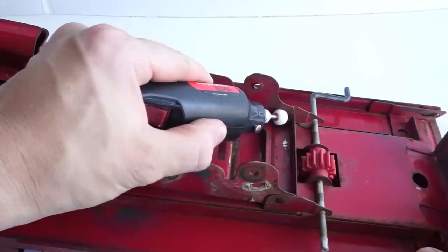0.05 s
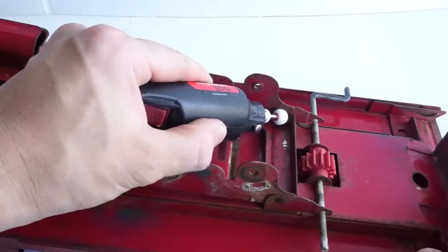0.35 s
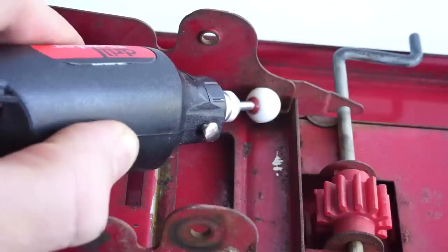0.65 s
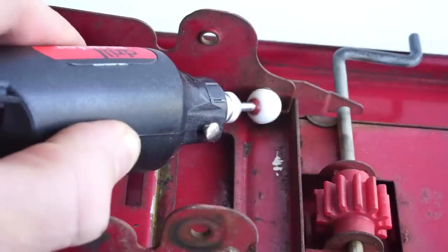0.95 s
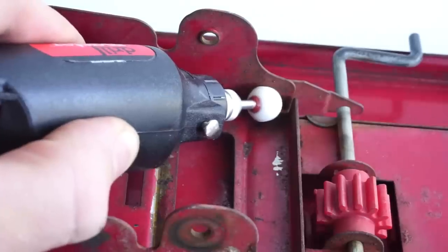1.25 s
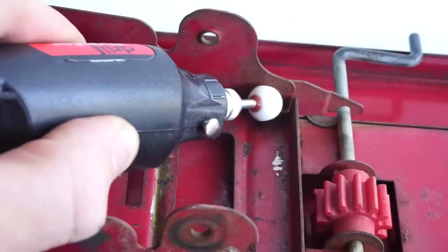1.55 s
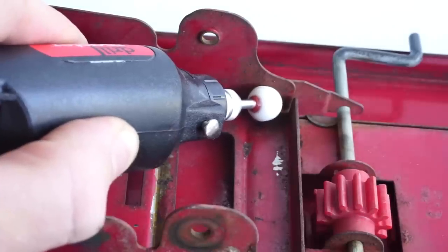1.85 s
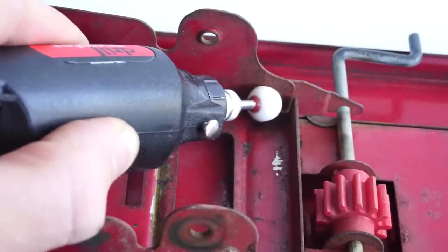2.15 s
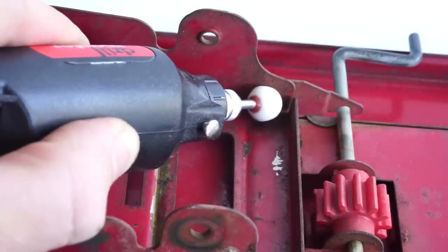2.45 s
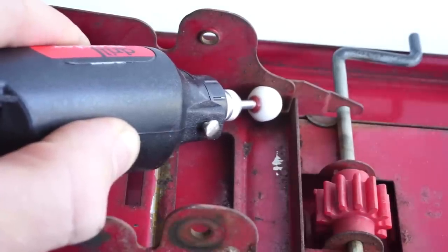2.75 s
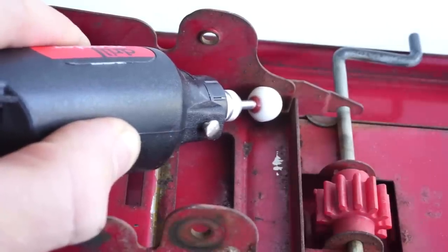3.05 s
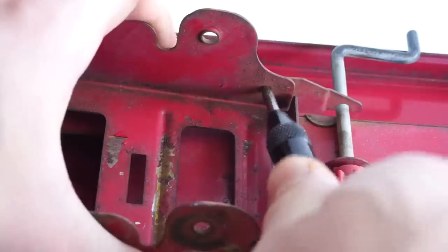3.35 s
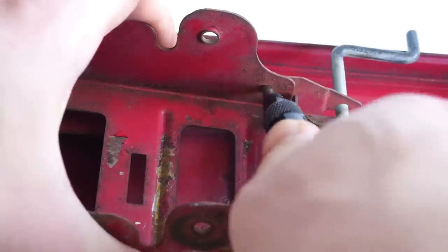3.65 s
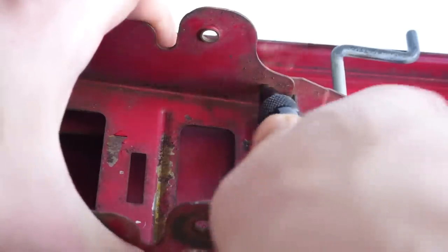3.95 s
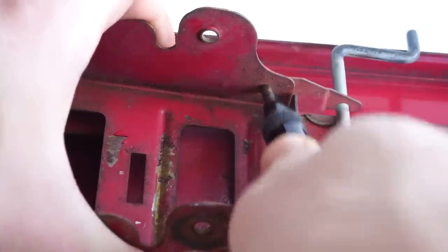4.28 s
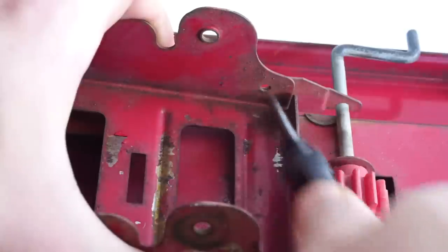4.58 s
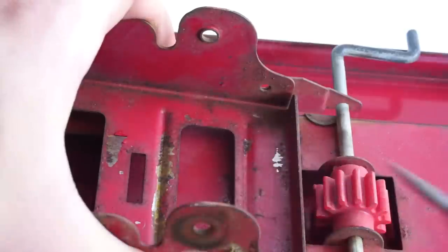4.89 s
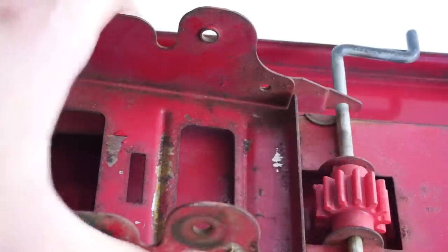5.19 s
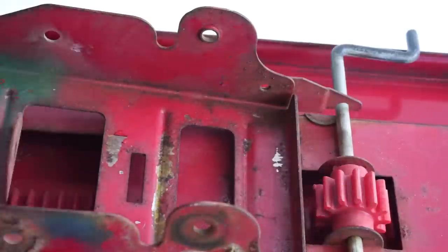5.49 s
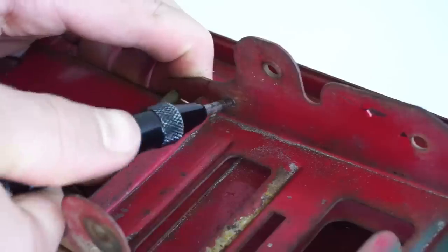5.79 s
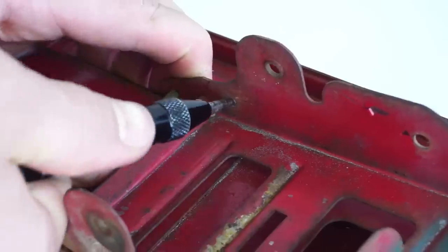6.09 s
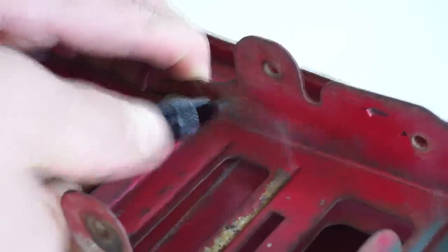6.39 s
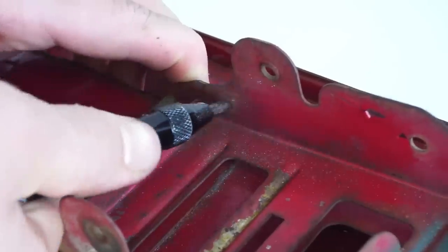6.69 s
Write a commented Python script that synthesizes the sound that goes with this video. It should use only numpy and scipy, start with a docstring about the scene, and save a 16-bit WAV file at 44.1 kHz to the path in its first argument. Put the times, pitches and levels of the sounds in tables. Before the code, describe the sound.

A small rotary tool whines at a high pitch from the start, close and just left of centre, its stone rasping on a steel toy's rivet. After a tiny break at 0.4 seconds, the grinding grows rougher and more chattering as the motor's pitch gradually sags. It cuts off at about 3.2 seconds, leaving a faint, low workshop rumble.

A pen-like electrode knocks dully and scrapes on the sheet metal around 3.3 and 3.6 seconds. At 4 seconds it makes contact with a sharp snap and a brief sizzle of burning paint, and the steel rings faintly. Light ticks, dry crackles and scratches follow, with a firmer knock near 4.7 seconds and softer knocks and scrapes until 5.9. At 6.4 seconds, now further right, come a second snap and sizzle, a pop and lingering metallic tones, then one last sharp click at 6.8.

```python
"""A small rotary tool whines, then grinds a rivet on a pressed-steel toy, rasping and chattering
and slowing as the stone is pressed home. The grinding breaks off to the rumble of the workshop.
At the bench, before a stereo pair of microphones, a pen-like electrode knocks and scrapes on the sheet;
twice it makes contact with a snap and a sizzle of boiling paint, and the steel rings."""
import sys
import numpy as np
from scipy import signal
from scipy.fft import rfft, irfft, next_fast_len
from scipy.io import wavfile

SR = 44100
rng = np.random.default_rng(int(sys.argv[2]) if len(sys.argv) > 2 else 0)


def store_pcm(level_fs):
    """Save levels as 16-bit WAV."""
    pcm = np.round(np.clip(level_fs, -1, 1) * 32767).astype(np.int16)
    wavfile.write(sys.argv[1], SR, np.atleast_2d(pcm).T)


N = 301203
T = np.arange(N) / SR
CUT_S, GRIND_END_S, SHIFT_RIGHT_S = .417, 3.168, 5.57
FREE_HZ, TOP_HZ = 242, 11080  # shaft running free; upper edge of the treble


# The tool's speed, sagging as the stone is pressed home: time_s, shaft_hz
SHAFT_SPEED = [(0.03, 241.3), (0.1, 238.4), (0.3, 234.3), (0.425, 233.5), (0.435, 241.7), (0.62, 241.6),
               (0.95, 238.7), (1.12, 235.3), (1.3, 235.7), (1.53, 225.8), (1.72, 226), (1.86, 220.5),
               (2.13, 223.5), (2.27, 218.7), (2.43, 221.3), (2.58, 218.6), (3.08, 214.9)]
# Tone of the motor's whine, the high spots' chatter and the stone's rasp, each: freq_hz, level_db
WHINE_SPECTRUM = [(400, -12), (700, -18.5), (1200, 0.5), (1900, 3), (2350, 7), (3000, 4), (4000, -12),
                  (4700, 17), (5400, -1), (6800, -16), (7500, 4.5), (11000, -36)]
CHATTER_SPECTRUM = [(400, -53), (650, -16), (1050, 0), (1700, -11), (2400, 10), (4000, 0), (5700, 9.5),
                    (7000, 7.5), (11000, -41)]
RASP_SPECTRUM = [(40, -36.5), (300, -28), (550, -36), (760, -20.5), (1050, -9.5), (1600, -13), (2200, -1.5),
                 (3500, -6), (4700, -2), (6800, -7), (7800, 0), (11000, 1.5)]

def grinder():
    """Just left of centre a motor whines; the stone's high spots strike once a turn and its grains rasp."""
    hz, = curves(SHAFT_SPEED)
    rasp_db, chatter_db, whine_db, hum_db = loading(hz)
    turn = np.cumsum(hz * (1 + 0.0012 * walk(60))) / SR
    whine = through_body(orders(turn, flicker_db=2.5, flicker_rate=14), WHINE_SPECTRUM) * undb(whine_db)
    skid = .005 * walk(130)  # the stone skids from turn to turn, blurring its high orders
    bite = undb(1.53 * walk(34.82))
    strikes = orders(turn + skid, flicker_db=5.0, flicker_rate=24)
    chatter = through_body(strikes, CHATTER_SPECTRUM) * undb(chatter_db)
    grains = air(N) * (1 + 0.1 * np.cos(2 * np.pi * turn)) * undb(walk(400))
    rasp = through_body(grains, RASP_SPECTRUM) * undb(rasp_db)
    hum = (np.sin(2 * np.pi * turn) + 0.25 * np.sin(4 * np.pi * turn)) * undb(hum_db + 2 * walk(31))
    return (whine + shank(hz) + bracket(hz) + bite * (chatter + rasp)) * pan(1.2) + hum


# The stone catches and chatters for a moment: peak_s, lift_db
STONE_CATCHES = [(.02, 12), (.6, 9), (1.5, 4)]

def loading(hz, shake_hz=226, shake_width_hz=4.3, catch_s=0.037):
    """Levels of rasp, chatter, whine and hum, from how far the work drags the shaft speed down."""
    sag_hz, before_cut = FREE_HZ - hz, T < CUT_S
    # while grinding, whine and hum are weak but swell as the speed passes shake_hz
    shake_db = 7.5 * np.exp(-((hz - shake_hz) / shake_width_hz) ** 2)
    catch_db = sum(db * np.exp(-.5 * ((T - s) / catch_s) ** 2) for s, db in STONE_CATCHES)
    rasp_db = -34 + 0.12 * sag_hz - 1.5 * before_cut
    chatter_db = -49 + 0.509 * sag_hz + catch_db
    whine_db = np.where(before_cut, -42 + 1.3 * sag_hz, -46 + shake_db)
    hum_db = np.where(before_cut, -61.5, -78.5 + shake_db)
    return rasp_db, chatter_db, whine_db, hum_db


def orders(turn, flicker_db, flicker_rate, count=52):
    """Multiples of the shaft rate, each wavering by itself; high ones reach the microphones out of step."""
    out = np.zeros((2, N))
    for k in range(1, count + 1):
        level = undb(flicker_db * walk(flicker_rate))
        phase = 2 * np.pi * k * turn + rng.uniform(0, 2 * np.pi)
        lead = rng.choice([-1, 1]) * min(0.13 * np.sqrt(k), np.pi / 4)
        out += level * np.cos([phase + lead, phase - lead])
    return out


# Resonances of tool and clamped work, before coupling scales them: pitch_hz, width_hz, left_db, right_db
BODY_RESONANCES = [(655, 45, 11, 11), (1082, 45, 13, 8), (1325, 70, 9, 9), (1880, 60, 4, 4),
                   (2378, 60, 7, 11), (4340, 80, 7, 8), (4575, 80, 13, 6), (4830, 80, 13, 12),
                   (5520, 60, 8, 2), (5647, 45, 10, 9), (5839, 40, 12, 5), (7380, 70, 9, 3),
                   (7633, 60, 9, 3), (8221, 50, 8, 6), (8680, 40, 5, 5), (9178, 45, 7, 6),
                   (9468, 60, 10, 2), (9808, 35, 7, 9), (10136, 55, 9, 3), (10425, 80, 10, 5),
                   (10860, 100, 6, 5)]

def through_body(x, points, coupling=1.244):
    """Tool and work radiate a spectrum, their resonances lifting it differently at each microphone."""
    def gain(f):
        lift_db = sum(np.array([[left], [right]]) * resonance(f, hz, width)
                      for hz, width, left, right in BODY_RESONANCES)
        return undb(spectrum(points, f) + coupling * lift_db) * (f < TOP_HZ)
    return unit(colour(x, gain))


def shank(shaft_hz, throb_db=7, throb_rate=24.33):
    """The stone on its thin shank squeals in uneven throbs, most while it spins fast."""
    squeal = unit(colour(air(N), lambda f: resonance(f, hz=4828, width_hz=70)))
    return squeal * undb(-39 - 1.03 * (FREE_HZ - shaft_hz) + throb_db * walk(throb_rate))


def bracket(shaft_hz, pressed_db=-44):
    """The rivet's bracket sings in a narrow band, loudest when the stone is pressed hardest."""
    tone = unit(colour(air(N), lambda f: resonance(f, hz=1082, width_hz=44)))
    return tone * undb(pressed_db - 1.75 * (shaft_hz - shaft_hz.min()))


# Dull knocks at the bench: start_s, level_db, brightness_hz, mode_hz, ring_db
SHEET_KNOCKS = [(3.2554, -27.5, 1830, 961, -5), (3.615, -23.5, 1060, 947, -11),
                (4.6586, -23, 2190, 2360, -5.5), (5.0348, -33.5, 1110, 1293, 4.5),
                (5.579, -31.5, 840, 1174, -7)]

def knocks(thud_db=-20.5):
    """The electrode knocks on the sheet, rattles and thuds through the toy."""
    out, t = np.zeros((2, N)), T[:SR // 2]
    for s, db, hz, mode_hz, ring_db in SHEET_KNOCKS:
        thud = band(air(len(t)), hz=260, spread=0.99) * decay(t, t60=0.36) * undb(thud_db)
        rattle = strike(hz, mode_hz, t60=0.12, spread=2.24, ring_db=ring_db)
        add(out, undb(db) * (rattle + thud), s)
    return out


# Light touches on the steel: start_s, level_db, brightness_hz
TIP_TICKS = [(3.9328, -43, 4440), (4.175, -26.5, 6900), (4.311, -33.5, 5140), (4.354, -44, 4730),
             (4.374, -29, 2240), (4.408, -27, 4050), (4.588, -29.5, 3560), (4.632, -29, 5540),
             (4.715, -30.5, 4080), (5.199, -44, 4000)]

def ticks():
    """The bare tip taps the sheet, brief and bright."""
    out = np.zeros((2, N))
    for s, db, hz in TIP_TICKS:
        add(out, undb(db) * strike(hz, mode_hz=2480, t60=0.051, spread=2.24, ring_db=-5), s)
    return out


# Sharp cracks at the tip: start_s, level_db, brightness_hz
CONTACT_SNAPS = [(3.9661, -19, 2800), (6.4146, -20, 5230), (6.5539, -18.5, 930), (6.8078, -22.5, 5500)]

def snaps():
    """The current snaps and the paint pops, barely stirring the sheet."""
    out = np.zeros((2, N))
    for s, db, hz in CONTACT_SNAPS:
        add(out, undb(db) * strike(hz, mode_hz=4960, t60=0.0098, spread=3.05, ring_db=-12), s)
    return out


def strike(hz, mode_hz, t60, spread, ring_db, room_db=-25, room_t60=0.57):
    """A short rattle at the tip, the ring of the sheet and a faint tail from the room beyond."""
    t = T[:SR // 2]
    attack = 1 - np.exp(-t / (0.0059 * t60))
    push = band(air(len(t)), hz, spread) * decay(t, t60) * attack
    tail = band(air(len(t)), hz, spread) * decay(t, room_t60) * undb(room_db)
    return stir_sheet(push, mode_hz, favour_db=12, ring_db=ring_db) + tail


# The electrode's two contacts: start_s, hiss_db, sputter_db
PAINT_BURNS = [(3.966, -36.5, -36.5), (6.415, -37, -34.5)]
# Tone of the boiling paint's hiss and sputter, each: freq_hz, level_db
HISS_SPECTRUM = [(1500, -10), (3500, -31), (5000, 12.5), (7000, 4), (11000, 4.5)]
SPUTTER_SPECTRUM = [(300, -7), (700, 5), (1100, 7.5), (2300, 8.5), (3500, 11), (5000, 2), (9000, -10)]

def burns(attack_s=0.0026, hold_s=0.083, hiss_fall_db_per_s=181, sputter_fall_db_per_s=82):
    """Paint boils under the hot tip: a sudden crackling hiss over a lower sputter, dying away."""
    def sizzle(points):
        crackle = air(N) * undb(0.28 * walk(580))
        return unit(colour(crackle, lambda f: undb(spectrum(points, f)) * (f < TOP_HZ)))
    hiss, sputter = sizzle(HISS_SPECTRUM), sizzle(SPUTTER_SPECTRUM)
    push = np.zeros((2, N))
    for s, hiss_db, sputter_db in PAINT_BURNS:
        heat = np.clip((T - s) / attack_s + 1, 0, 1)
        cooling_s = np.maximum(T - s - hold_s, 0)
        push += heat * hiss * undb(hiss_db - hiss_fall_db_per_s * cooling_s)
        push += heat * sputter * undb(sputter_db - sputter_fall_db_per_s * cooling_s)
    return stir_sheet(push, mode_hz=2266, favour_db=3, ring_db=-6)


# Tones of the heated steel: start_s, pitch_hz, level_db, swell_s, t60_s
HOT_TONES = [(4.02, 1352, -44, .06, 1.3), (6.455, 2310, -32, .05, .25), (6.49, 667, -37.5, .05, 1.7),
             (6.5, 2202, -44, .05, .9), (6.45, 4078, -43, .04, .6)]

def singing():
    """Single tones of the heated sheet swell during a burn and linger after it."""
    out = 0
    for s, hz, db, swell, t60 in HOT_TONES:
        t = np.maximum(T - s, 0)
        envelope = np.minimum(t / swell, 1) * decay(np.maximum(t - swell, 0), t60)
        out += undb(db + 0.26 * walk(41)) * envelope * sine(hz * (1 + 0.0014 * walk(76)))
    return out


# Strokes across the paint: peak_s, half_length_s, level_db, brightness_hz
TIP_SCRAPES = [(3.453, 0.048, -49, 1850), (3.591, 0.058, -48, 1940), (4.479, 0.23, -50.5, 3380),
               (4.772, 0.021, -37, 2980), (5.298, 0.024, -47, 3440), (5.279, 0.27, -55.5, 3840),
               (5.863, 0.022, -37, 1250), (6.704, 0.012, -41, 2400)]

def scrapes(slips_per_s=360):
    """The tip drags over the paint in uneven slips, a few of them sharp, that stir the sheet."""
    push, t = np.zeros((2, N)), T[:2 * SR] - 1
    for s, half, db, hz in TIP_SCRAPES:
        swell = np.exp(-.5 * (t / half) ** 2) * undb(db)
        add(push, band(air(len(t)), hz, spread=1.82) * swell, s - 1)
    slips = (rng.random(N) < slips_per_s / SR) * undb(4 * np.minimum(rng.exponential(size=N), 3))
    push *= .55 + .7 * unit(smear(slips, tau_s=.002))
    return stir_sheet(push, mode_hz=3283, favour_db=2, ring_db=-8)


# Modes of the loose steel sheet: pitch_hz, level_db, t60_s
SHEET_MODES = [(961, 1.5, 0.15), (1060, -3.5, 0.18), (1293.5, -4, 0.37), (1486, -3.5, 0.15),
               (1814, -3, 0.14), (2025, -13, 0.33), (2266, -9, 0.23), (2372, 6.5, 0.053), (2832, -8, 0.22),
               (3283, -11, 0.28), (3750, -8, 0.17), (4140, -13, 0.33), (5020, -18.5, 0.15),
               (6700, -32.5, 0.42), (10400, -29, 0.22)]

def stir_sheet(push, mode_hz, favour_db, ring_db):
    """A push and the ring it stirs in the sheet; where it lands favours the modes near mode_hz."""
    t = T[:SR // 2]
    answer = np.zeros((2, len(t)))
    for hz, db, t60 in SHEET_MODES:
        scatter, lag = rng.standard_normal(2)
        lift_db = favour_db * np.exp(-(np.log(hz / mode_hz) / .08) ** 2) + 3 * scatter
        phase = 2 * np.pi * hz * t + np.array([[.6], [-.6]]) * lag
        answer += undb(db + lift_db) * decay(t, t60) * np.sin(phase)
    answer /= np.sqrt(2 * np.mean(np.sum(answer ** 2, axis=1)))
    ring = signal.fftconvolve(push, answer, axes=1)[:, :push.shape[1]]
    return push + undb(ring_db) * ring


def flakes(start_s=4.19, end_s=4.82, per_s=18, t60=0.02):
    """Burnt paint flakes off under the tip in small dry crackles at random moments."""
    cracks = (rng.random(N) < per_s / SR) * (T > start_s) * (T < end_s)
    sizes = cracks * undb(-42 + 2.5 * rng.standard_normal(N))
    return band(air(N), hz=4800, spread=1.9) * smear(sizes, tau_s=t60 / np.log(1000))


# Room tone around the bench: freq_hz, level_db
ROOM_SPECTRUM = [(15, -39), (25, -11), (66, -6.5), (101, -0.5), (178, -0.5), (391, -12.5), (721, -11),
                 (1000, -11.5), (1590, -24), (1710, -25.5), (5820, -43), (11000, -40.5), (14300, -87),
                 (22000, -120)]
# Recorded level of the rumble, ducking after the first snap and creeping back: time_s, level_db
RECORDED_RUMBLE_LEVEL = [(3.2, -46), (3.92, -44), (4.02, -50), (4.8, -46.5), (6.4, -43.5), (6.6, -44)]

def workshop():
    """Low room rumble and a faint wavering hum behind the work; their level ducks and creeps back."""
    rumble = unit(colour(air(N), lambda f: undb(spectrum(ROOM_SPECTRUM, f))))
    hum = sine(73 + 2 * walk(8.7)) * undb(-6.5 + 2 * walk(10))
    return (rumble + hum) * undb(curves(RECORDED_RUMBLE_LEVEL)[0] + walk(13))


# Stereo width at the microphone pair: freq_hz, side_gain_db
STEREO_WIDTH = [(30, -32), (120, -22.5), (250, -17.5), (500, -7), (1000, -8), (2000, -5.5), (4000, -3),
                (9000, -.5)]

def air(size, diffuse=0.51, count=64):
    """Noise at two microphones: alike in the bass, turned apart in the treble by reflections."""
    direct, scattered = rng.standard_normal((2, size))
    lead = rng.choice([-1, 1], count)
    reflected = colour(direct, lambda f: 1j * np.interp(f, np.linspace(0, SR / 2, count), lead))
    side = colour(reflected + diffuse * scattered, lambda f: undb(spectrum(STEREO_WIDTH, f)))
    return unit(np.array([direct + side, direct - side]))


def band(x, hz, spread):
    """A contact's colour, from hz / spread to hz * spread: steep below, gentler above; rms 1."""
    low, high = hz / spread, hz * spread
    def gain(f):
        return (f / low) ** 3 / np.sqrt((1 + (f / low) ** 6) * (1 + (f / high) ** 4.16)) * (f < TOP_HZ)
    return unit(colour(x, gain))


def colour(x, gain):
    """Filter by a gain that is a function of frequency."""
    size = next_fast_len(x.shape[-1] + 2048)
    hz = np.arange(size // 2 + 1) * SR / size
    return irfft(rfft(x, size) * gain(hz), size)[..., :x.shape[-1]]


def resonance(f, hz, width_hz):
    """A peak of height 1, width_hz across at half height."""
    return 1 / (1 + (2 * (f - hz) / width_hz) ** 2)


def spectrum(points, hz):
    """dB of a point spectrum at these frequencies."""
    f, db = np.transpose(points)
    return np.interp(np.log(hz + 1), np.log(f), db)


def curves(table):
    """Each column of a time table, sample by sample."""
    s, *columns = np.transpose(table)
    return [np.interp(T, s, c) for c in columns]


def walk(rate):
    """Random levels, rate of them a second, joined by straight lines."""
    points = rng.standard_normal(4096)
    return 0.84 * np.interp(T * rate, np.arange(len(points)), points)


def sine(hz):
    """A tone that follows a moving pitch."""
    return np.sin(2 * np.pi * np.cumsum(hz) / SR)


def decay(t, t60):
    """A fall of 60 dB every t60 seconds."""
    return np.exp(-np.log(1000) * t / t60)


def smear(impulses, tau_s):
    """Give each impulse an exponential tail."""
    return signal.lfilter([1], [1, -np.exp(-1 / (tau_s * SR))], impulses)


def add(out, sound, s):
    """Mix a sound in at a time."""
    i = int(s * SR)
    out[:, i:i + sound.shape[1]] += sound[:, :N - i]


def pan(db):
    """Microphone gains for a left minus right level."""
    return undb(np.array([[db], [-db]]) / 2)


def undb(db):
    """Decibels to gain."""
    return 10 ** (np.asarray(db) / 20)


def unit(x):
    """Scale to rms 1."""
    return x / np.sqrt(np.mean(x ** 2))


def scene():
    """First the grinding, then the electrode, heard further to the right from SHIFT_RIGHT_S on."""
    electrode = knocks() + ticks() + snaps() + scrapes() + flakes() + burns() + singing()
    shifted = np.array([np.roll(electrode[0], 2), electrode[1]])  # the left microphone hears it later
    bench = np.where(T < SHIFT_RIGHT_S, electrode * pan(0.75), shifted * pan(-4.0)) + workshop()
    # the sound cuts and fades quickly back in on the grinding
    fade = np.where(T < CUT_S, 1, np.minimum((T - CUT_S) / 0.017, 1))
    return np.where(T < GRIND_END_S, grinder() * fade, bench)


def record(dry):
    """The recorder cuts the top steeply."""
    return signal.sosfilt(signal.ellip(12, .2, 75, TOP_HZ, fs=SR, output="sos"), dry)


dry = scene()
out = record(dry)
store_pcm(out)
```